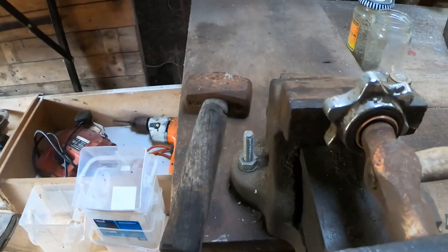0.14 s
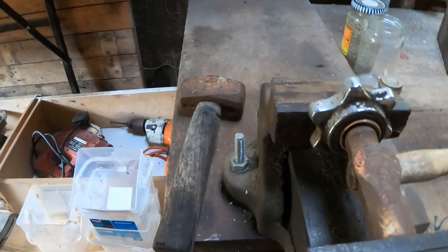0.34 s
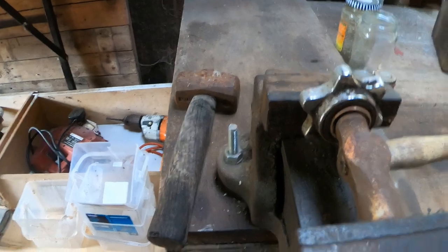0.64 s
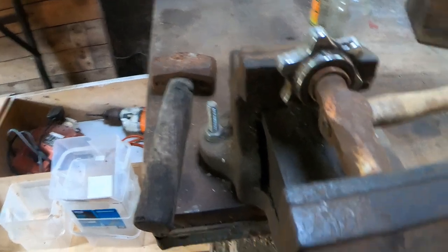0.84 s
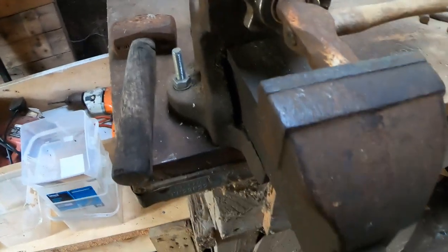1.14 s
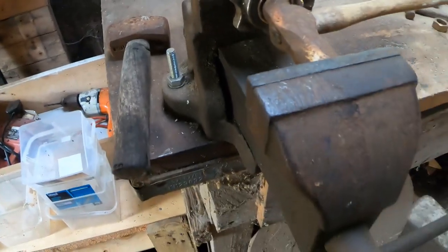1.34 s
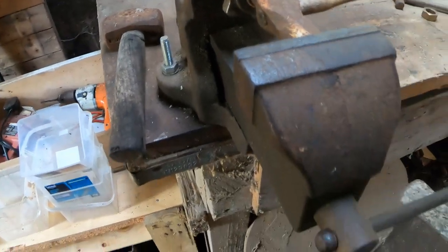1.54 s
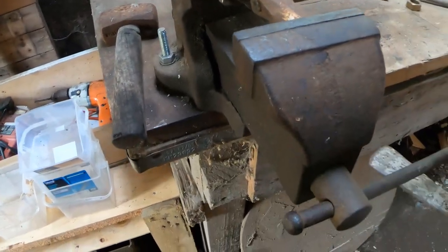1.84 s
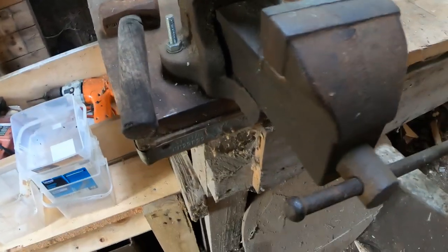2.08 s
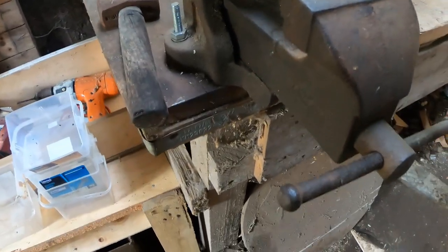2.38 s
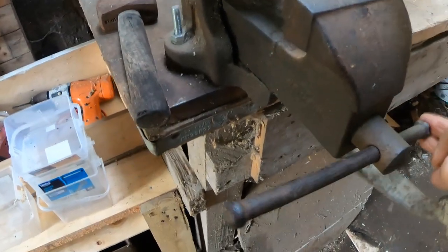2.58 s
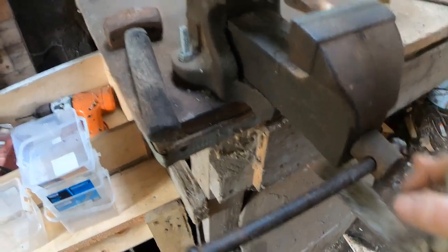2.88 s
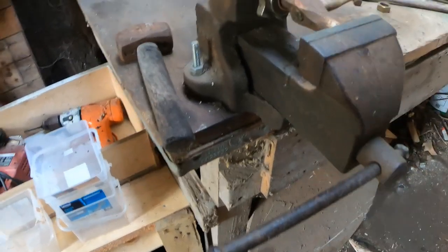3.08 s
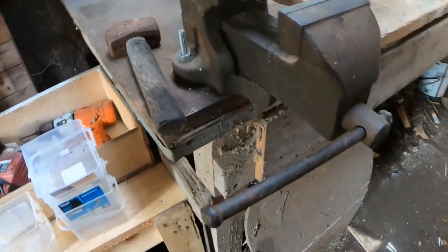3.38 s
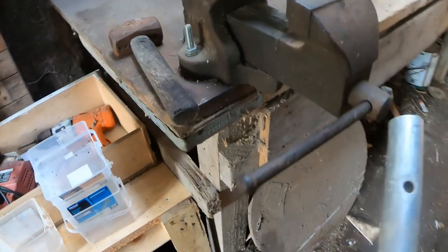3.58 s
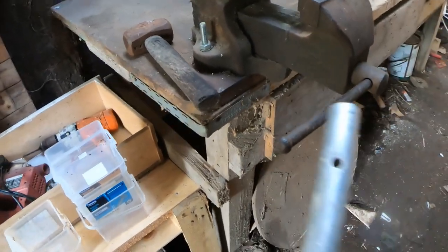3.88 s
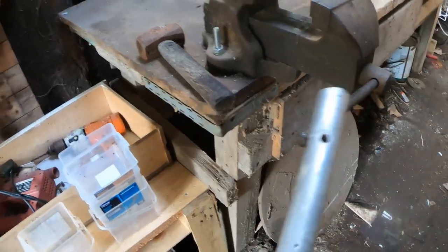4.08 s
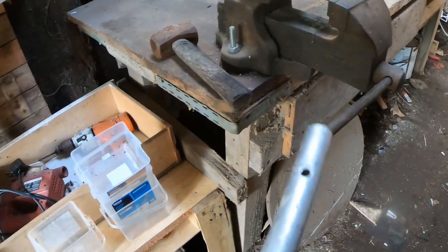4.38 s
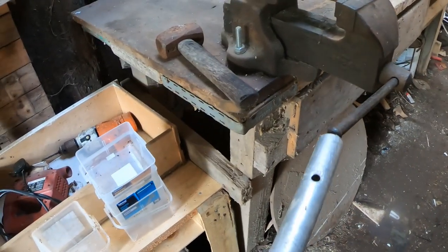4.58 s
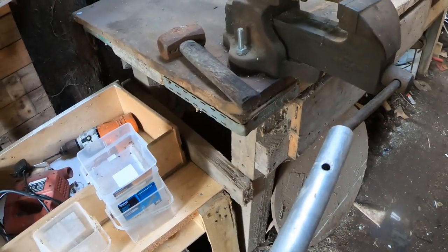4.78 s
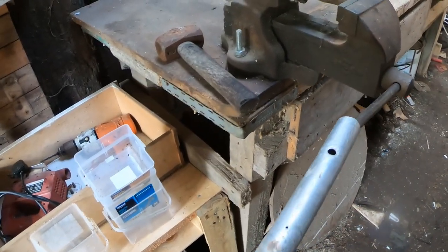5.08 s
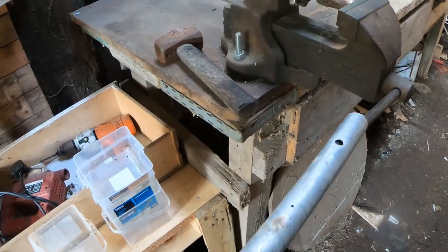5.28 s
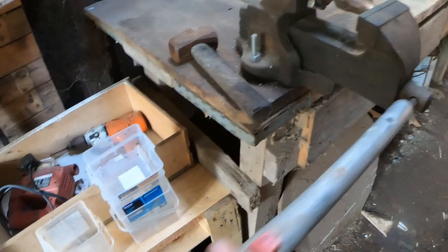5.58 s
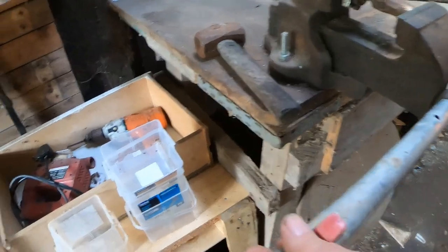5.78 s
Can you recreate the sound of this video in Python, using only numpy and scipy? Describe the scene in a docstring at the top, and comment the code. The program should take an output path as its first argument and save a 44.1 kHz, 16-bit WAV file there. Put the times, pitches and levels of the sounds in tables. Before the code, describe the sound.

In a small wooden workshop, steel briefly grates on a vice jaw, then a loose handle clacks with booming bench thuds and rasping, squealing thread. After a quieter stretch of cloth rustle and dull knocks, a hollow pipe taps and scrapes onto the handle, ending in a hard clank. Songbird, crows and low engines sound outside. Close stereo microphone, short room.

```python
"""Engines drone and rumble outside a small wooden workshop while steel grates over the iron jaw of a vice.
Loose iron clacks, the bench booms, a songbird whistles, crows call and sleeves rustle.
Then the vice is spun shut: its dry screw rasps, squeals and snaps free, and the handle clacks and ticks.
After dull knocks a pipe hoots, taps the handle, scrapes along it and seats with a loud clank.
Rubbing is shaped noise and wavering tones, blows are dying tones and noise bursts; the walls answer."""
import sys
import numpy as np
from scipy import signal
from scipy.fft import rfft, irfft, next_fast_len
from scipy.io import wavfile
from scipy.ndimage import uniform_filter1d, map_coordinates

SR = 44100
rng = np.random.default_rng(int(sys.argv[2]) if len(sys.argv) > 2 else 0)


def dump(signal):
    """Clip the signal to [-1, 1] and save it as 16-bit WAV at the path in sys.argv[1]."""
    limited = np.clip(np.atleast_2d(signal).T, -1, 1)
    pcm = np.round(limited * 32767).astype(np.int16)
    wavfile.write(sys.argv[1], SR, pcm)


N = 261513
TIME = np.arange(N) / SR  # the whole scene, in seconds
AGE = np.arange(SR * 3 // 5) / SR  # seconds since a blow

# Levels are relative: each source is mixed at its own strength.
# engine outside, speeding up, easing off and pulling again: (time [s], firing pitch [Hz], level [dB])
ENGINE = [(0.04, 59.07, -38.5), (1.73, 71.1, -41), (2.09, 67.07, -49), (2.31, 75.4, -40.5),
          (3.05, 82.3, -41.5), (3.7, 86.06, -35.5), (3.84, 79.6, -39.5), (4.16, 57.28, -46.5),
          (4.45, 56.7, -37.5), (4.6, 53.4, -42), (5.2, 57.62, -39.5), (5.43, 58.4, -28.5),
          (5.73, 60.8, -35), (5.78, 62.3, -45)]
# another engine, swelling and fading: (time [s], firing pitch [Hz], level [dB])
SECOND_ENGINE = [(.7, 71, -54), (1.3, 79.4, -41.5), (1.8, 86, -65)]
# colour of the low rumble: (frequency [Hz], level [dB per Hz])
RUMBLE_COLOUR = [(12, -18.5), (20, -1.5), (29, 2.5), (42, -8.5), (60, -7), (90, -13.5), (130, -20),
                 (200, -23), (300, -30), (500, -45), (1400, -47.5), (3000, -50), (6000, -55.5),
                 (10000, -68.5), (12000, -106)]
# likeness of the left and right noise: (frequency [Hz], likeness [0-1])
STEREO_LIKENESS = [(100, 0.92), (300, 0.92), (700, 0.15), (2000, 0.035), (5000, 0.29), (9000, 0.015)]
# how long the walls answer: (frequency [Hz], time to fall 60 dB [s])
ROOM_DECAY = [(150, 0.46), (700, 0.27), (3000, 0.23), (10000, 0.26)]
# treble loss of the microphones: (frequency [Hz], level [dB])
MICROPHONE = [(9500, -1.5), (10500, -4), (11500, -15), (13500, -8.5), (15000, -13)]

# Ring times in all tables are the time to fall by 60 dB.
# pulls of steel over the iron jaw: (start [s], length [s], level [dB])
DRAGS = [(0, 0.033, -37), (.08, 0.12, -42.5), (.217, 0.025, -39)]
# colour of steel on iron: (frequency [Hz], level [dB per Hz])
IRON_COLOUR = [(180, -32), (300, -0.5), (568, -0.5), (637, -11), (763, 0.5), (1310, -0.5), (1540, 7.5),
               (2360, -7.5), (4120, -13.5), (5180, -4), (9800, -19), (11200, -33), (13800, -21),
               (15000, -37)]
# resonances of the dragged steel: (pitch [Hz], width [Hz], level [dB])
STEEL_CHATTER = [(1090, 95, -14), (1630, 50, -14), (2380, 54, 7.5), (4710, 190, 0.5), (5230, 73, 6.5),
                 (6370, 95, -9), (8470, 170, -13)]
# steel knocking on the jaw: (time [s], knock level [dB], ring level [dB])
JAW_HITS = [(0.0325, -39.5, -60), (0.0735, -42, -50), (.083, -45, -42), (.099, -42.5, -45),
            (.121, -63, -47), (.143, -47, -44), (.228, -35.5, -40.5), (0.247, -51, -47)]
# ringing of the steel: (pitch [Hz], level [dB], ring time [s])
STEEL_MODES = [(732, 0, 0.12), (1093, 4, 0.15), (1510, 1, 0.089), (1760, -16, 0.053), (1930, -16, 0.084),
               (2420, 0, 0.11), (2900, 0.5, 0.084), (3380, -7, .08), (5060, -10, 0.11), (5770, -17, 0.11)]
# ringing of the free jaw: (pitch [Hz], level [dB], ring time [s])
JAW_MODES = [(4740, 0, .46), (4840, -2, .2), (5280, -7, .1)]
# clonk of the settling steel: (pitch [Hz], level [dB], ring time [s])
SETTLE_MODES = [(984, -2, 0.093), (1047, 9, 0.077), (1230, -3, 0.11), (3280, -0.5, 0.049)]

# loose iron jolts in its play:
# (time [s], low clack [dB], bright clack [dB], bench boom [dB], boom pitch factor [ratio])
JOLTS = [(0.285, -42, -41.5, -33, 0.97), (0.786, -51.5, -44.5, -45, 1.01), (1.53, -54, -64, -41.5, 1),
         (1.763, -32.5, -42, -26, 0.96), (1.927, -31.5, -47.5, -24.5, 0.97), (2.077, -47, -65, -31.5, 1.01),
         (2.195, -39.5, -47, -34, 1.1), (2.315, -47, -64, -36, 1.04), (2.462, -34.5, -44, -30.5, 1.06),
         (2.592, -31, -40.5, -25.5, 1.02), (2.73, -32.5, -30, -28, 1.16), (2.771, -39, -39.5, -30, 1.05)]
# handle in its play: (pitch [Hz], level [dB], ring time [s])
HANDLE_MODES = [(573, 13, 0.049), (660.7, 5.5, 0.13), (710, -4, 0.18), (832, 8.5, 0.088), (1025, -7, 0.27)]
# colours of the low and bright parts of a clack: (frequency [Hz], level [dB per Hz])
LOW_CLACK_COLOUR = [(250, 1.0), (450, -4.5), (800, -4), (1100, -28.0), (1500, -34), (4000, -67)]
BRIGHT_CLACK_COLOUR = [(700, 3.5), (1200, 2.5), (1500, 7.5), (2000, -0.5), (2700, 4.5), (6000, -32.0),
                       (12000, -69)]
# dull knocks as the pipe is picked up: (time [s], level [dB])
KNOCKS = [(3.461, -37), (3.952, -44.5)]
# colour of a dull knock: (frequency [Hz], level [dB per Hz])
KNOCK_COLOUR = [(120, -30), (300, -0.5), (520, 1.5), (800, 5.5), (950, -17), (1200, -14.0), (4000, -29.0),
                (10000, -82)]
# wooden bench before each jolt shifts it: (pitch [Hz], level [dB], ring time [s])
BENCH_MODES = [(129, -2, 0.11), (155.3, -7, 0.3), (184.8, 4.5, 0.18), (210.1, -4.5, 0.31),
               (241.7, -12.5, 0.29), (307.8, -9, 0.22), (352.6, -8.5, 0.16), (408.3, -22.5, 0.41),
               (495, -38, 0.47)]

# songbird notes: (start [s], length [s], start pitch [Hz], end pitch [Hz], level [dB], flutter [dB])
SONG = [(0.331, 0.18, 2207, 1977, -56.5, 6.5), (0.531, 0.14, 2730, 2520, -60.5, 7),
        (0.586, .09, 2210, 1880, -58.5, 10), (0.645, 0.21, 1875, 1825, -52.5, 1),
        (0.793, 0.14, 1876, 2130, -53, 1.5), (1.01, 0.073, 3220, 3115, -53, -6),
        (1.051, 0.098, 3030, 2895, -49.5, -2), (1.183, 0.08, 2970, 2800, -53, -1),
        (1.175, 0.088, 2490, 2400, -60, 6), (1.365, 0.055, 2260, 2193, -42, -17),
        (1.411, 0.055, 2200, 2040, -47, -4), (1.443, 0.097, 2048, 2095, -50, -4.5),
        (1.512, 0.15, 2166, 2260, -44.5, -4.5), (1.655, 0.13, 2268, 2323, -43, 0.5),
        (1.779, .06, 2210, 2225, -46, 0), (2.04, 0.06, 2340, 2345, -52, -20),
        (2.086, 0.1, 2310, 2295, -48, -16), (2.491, 0.078, 2303, 2388, -47.5, -18)]
# crow calls: (centre [s], half length [s], level [dB])
CAWS = [(0.6, 0.12, -42.5), (0.738, 0.43, -44.5), (0.98, 0.026, -33), (1.434, 0.11, -33), (1.68, 0.14, -36),
        (1.939, 0.087, -31.5), (2.205, 0.13, -38), (3.22, 0.065, -40), (3.31, 0.053, -38.5),
        (3.6, 0.051, -34.5), (3.742, 0.055, -37), (4.085, 0.076, -40), (4.435, 0.035, -43.5)]
# colour of a caw: (frequency [Hz], level [dB per Hz])
CAW_COLOUR = [(700, -37.5), (1150, -23.0), (1300, -4.5), (1400, -5.0), (1520, -10.0), (1750, -26.5),
              (3000, -67)]
# arm movements that crumple a sleeve: (start [s], length [s], level [dB])
CRUMPLES = [(.56, 0.28, -50), (.96, 0.21, -49), (1.27, 0.052, -47), (1.36, 0.75, -54.5), (1.94, 0.33, -49),
            (2.8, 0.5, -48), (3.47, 0.317, -46), (3.865, 0.069, -38.5), (3.97, 0.42, -59)]
# cloth gliding on cloth: (centre [s], half length [s], level [dB])
SWISHES = [(1.305, 0.052, -57.5), (1.57, 0.28, -49.5), (3.03, 0.3, -56.5), (3.28, 0.14, -63),
           (3.66, 0.08, -64.5), (3.92, 0.27, -53.5), (4.3, 0.35, -64.5)]
# colour of crumpling cloth: (frequency [Hz], level [dB per Hz])
CRUMPLE_COLOUR = [(150, -27), (300, -7.5), (500, 0.5), (850, -0.5), (1100, -2), (1800, 4.5), (2400, -3.5),
                  (3100, 3), (3900, -9.5), (5300, -6), (6600, -14.5), (8700, -16), (15000, -38)]
# colour of gliding cloth: (frequency [Hz], level [dB per Hz])
GLIDE_COLOUR = [(2350, -3.5), (4000, -4), (5890, -4), (7470, -7.5), (9020, -6.5), (13700, -17.5),
                (15000, -19)]

# pushes on the dry screw: (slip time [s], swell time [s], rasp level [dB], hum level [dB])
STROKES = [(1.763, 0.042, -38.5, -42), (1.91, 0.022, -36.5, -46.5), (2.06, 0.017, -51, -39.5),
           (2.189, 0.031, -36, -43), (2.305, 0.011, -43.5, -53.5), (2.453, 0.028, -32, -42),
           (2.586, 0.014, -35, -38.5), (2.668, 0.0098, -32.5, -50), (2.699, 0.02, -32, -47),
           (2.729, 0.012, -35.5, -29.5)]
# colour of the rasp: (frequency [Hz], level [dB per Hz])
RASP_COLOUR = [(240, -5.5), (400, -11.5), (690, -10), (1070, -17.5), (1430, -4.5), (1970, -10), (2960, -20),
               (4130, -19.5), (7930, -34.5), (10700, -33.5), (12100, -72), (13100, -44), (15000, -44)]
# the rubbed handle: (pitch [Hz], width [Hz], level [dB])
HANDLE_GROAN = [(657, 34, -6), (855.5, 8.4, 6)]
# resonances of the screw: (pitch [Hz], width [Hz], level [dB])
SCREW_PEAKS = [(2820, 28, -2), (3043, 37, 3.5), (3430, 160, -3), (3750, 60, 0), (4620, 155, -9),
               (5330, 31, -13.5), (6860, 67, -14.5), (8100, 91, -37)]
# squeals of the thread:
# (start [s], length [s], start pitch [Hz], end pitch [Hz], low tone [dB], upper tone [dB])
SQUEALS = [(1.723, 0.033, 2900, 2860, -47, -51), (1.894, 0.022, 2860, 2910, -43, -52.5),
           (2.154, 0.035, 2910, 2860, -53, -51), (2.582, 0.0087, 3120, 2960, -40.5, -51.5),
           (2.653, 0.016, 3180, 3030, -44.5, -59), (2.675, 0.04, 2930, 2880, -43.5, -53),
           (2.705, 0.029, 2904, 2865, -30, -59)]
# the thread lets go: (time [s], level [dB])
SNAPS = [(1.758, -40.5), (1.921, -44.5), (2.434, -41.5), (2.448, -42.5), (2.583, -47.5), (2.7165, -33),
         (2.7245, -50)]
# colour of a snap: (frequency [Hz], level [dB per Hz])
SNAP_COLOUR = [(600, -2), (1700, 3.0), (3600, 0.0), (4400, -7.0), (7500, -16), (11000, -41), (15000, -40)]
# small ticks of the handle against its collar: (time [s], level [dB])
TICKS = [(1.845, -53), (2.013, -47.5), (2.24, -46.5), (2.864, -38.5)]
# colour of a tick: (frequency [Hz], level [dB per Hz])
TICK_COLOUR = [(400, -18), (900, 1.0), (3500, -2.5), (4500, -6), (8000, -9), (15000, -31)]

# hoots of the hollow pipe: (centre [s], half length [s], level [dB])
HOOTS = [(4.785, 0.062, -54), (5.03, 0.025, -49), (5.12, 0.062, -43.5), (5.29, 0.028, -44.5)]
# resonances of the hoot: (pitch [Hz], width [Hz], level [dB])
HOOT_PEAKS = [(686, 134, -1), (780, 15, 7.5)]
# the pipe touches the handle: (time [s], click level [dB], ring level [dB], click tilt [dB per octave])
TAPS = [(4.7455, -42, -40, 0.5), (4.792, -41, -40, -2.5), (4.820, -40, -36.5, 1.5), (4.980, -53, -50, 2),
        (5.007, -45, -49, -1.5), (5.025, -46.5, -38.5, 1), (5.059, -45, -42.5, 0), (5.124, -41, -49, -3),
        (5.151, -41, -39.5, -1), (5.200, -39, -41.5, 1), (5.215, -39.5, -56, 0.5), (5.248, -39, -46, -1.5),
        (5.269, -44, -51, 4), (5.287, -42, -54, -0.5), (5.318, -42.5, -37.5, 0), (5.338, -49.5, -36.5, 7),
        (5.386, -59, -41, 7), (5.407, -50, -44, 11), (5.434, -40.5, -42.5, 3), (5.455, -50, -48, 12),
        (5.497, -51.5, -37, 2), (5.526, -43, -40.5, 5), (5.569, -48, -41, 1.5)]
# strongest pipe modes, each sings best at one depth of contact:
# (pitch [Hz], ring time [s], level [dB], best depth [0-1], reach [depth], level far from it [dB])
SINGING_MODES = [(1458, 0.32, -1.5, 0.31, 0.32, -28), (2110, 0.28, -1.5, 0.81, 0.067, -18.5),
                 (2512, 0.1, -7, 0.88, 0.13, -11), (4855, 0.31, 1.5, 0.85, 0.042, -10),
                 (5268, 0.15, 1, 0.14, 0.24, -17.5), (5230, 0.11, 3, 0.71, 0.066, -26)]
# weaker pipe modes: (pitch [Hz], level [dB], ring time while loose [s])
PIPE_MODES = [(703, 1.5, 0.18), (791, 5, 0.23), (900, -19, 0.24), (1304, 4, 0.33), (1542, -2.5, 0.33),
              (2230, 9.5, 0.056), (2552, -16, 0.17), (2550, 1, 0.2), (3215, -0.5, 0.26), (3540, -14, 0.16),
              (3840, -20, .2), (4230, -1.5, 0.11), (5800, -20, 0.25), (6500, -8, 0.15), (7200, -13, 0.1),
              (8260, -12, 0.18)]
# shoves of the pipe along the handle: (start [s], length [s], scrape level [dB], singing level [dB])
SHOVES = [(4.817, 0.046, -56, -47), (4.88, 0.095, -64, -64), (5.003, 0.174, -62.5, -49.5),
          (5.204, 0.088, -51.5, -60), (5.325, 0.029, -51, -44), (5.379, 0.019, -50, -52),
          (5.428, 0.047, -47, -56), (5.488, 0.067, -48.5, -45.5), (5.565, 0.031, -56, -43.5),
          (5.657, 0.12, -47.5, -41.5)]
# colour of the scrape: (frequency [Hz], level [dB per Hz])
SCRAPE_COLOUR = [(150, 5), (280, 1.5), (430, -12), (750, -11), (950, -7), (1400, -3.5), (1850, -7),
                 (2400, -6.5), (3800, -15.5), (5300, -4), (7300, -16.5), (10000, -31), (12000, -45),
                 (15000, -48)]
# resonances of the scraping tube: (pitch [Hz], width [Hz], level [dB])
TUBE_PEAKS = [(790, 61, -5), (1290, 29, -1.5), (1440, 28, -21), (2140, 11, -17), (2460, 40, -9.5),
              (3220, 180, -2), (4000, 61, -11), (4330, 22, 3), (4930, 22, 7.5), (5240, 39, -11),
              (6112, 28, 3), (7150, 100, -9.5), (8300, 160, -21), (9740, 42, -20), (12600, 120, -21)]
# the pipe rattles against the screw head and hits home:
# (time [s], crack level [dB], ring level [dB], head level [dB])
CLANKS = [(5.6755, -32, -39.5, -47), (5.694, -37, -33.5, -38), (5.7214, -12.5, -23, -42),
          (5.7325, -30, -31.5, -27.5), (5.739, -34, -36, -38)]
# colour of the crack: (frequency [Hz], level [dB per Hz])
CRACK_COLOUR = [(180, -31), (300, -11.5), (568, -17), (1000, -7), (1350, 0), (1620, -1.5), (1850, -20),
                (2480, 2.5), (2820, -23), (3860, -22), (4850, -25), (8460, -36), (11200, -56), (12500, -61),
                (15000, -85)]
# screw head with the pipe on it: (pitch [Hz], level [dB], ring time [s])
HEAD_MODES = [(704, 1.5, 0.12), (894, -4, 0.25), (1085, -9, 0.1), (1465, -3, 0.19), (1590, -7, 0.13),
              (2157, 2, 0.12), (2590, -16, 0.4), (3170, -3.5, 0.082), (4740, -13, 0.33)]

TOP_HZ = 15000  # nothing higher is kept
ROAD_DB, ROAD_SWING_DB = -38, 1.5  # rumble level and its slow unevenness
PRESSED_T60_S = 0.22  # the jaw rings briefly while the steel rests on it
LIFT_S, LIFT_DB = .257, -40.5  # the steel lifts and the jaw sings on freely
DROP_S, DROP_DB = .282, -37.5  # the steel settles with a clonk
THUMP_LAG_S = 0.01065  # the bench follows each jolt
CLACK_RISE_S = 0.0055  # the heavy iron takes up its play softly
BLUR_PER_S = 160  # how fast a whistle flutters
MOVE_ATTACK_S, MOVE_RELEASE_S, MOVE_DRIFT_DB = 0.042, 0.022, -2  # each crumple starts, stops and wavers alike
SLIP_S = 0.01  # the rasp dies this fast once the thread slips
UPPER_SQUEAL_HZ, SQUEAL_JITTER = (5370, 5260), 0.0076  # start and end of the upper tone; pitch scatter
SQUEAL_HISS_DB = -7
PIPE_ON_S, SEATED_S = 4.7, 5.7212  # the pipe slides on at a steady speed: depth 0 to 1
SEAT_JOLT_DB = -27  # its arrival jolts the bench too
GRIP = 0.45  # share of its ring time that the pipe loses when it is fully on
BORE_SHIFT_DB, BORE_SHIFT_PER_S = 4, 13  # how far and how fast tube resonances swell and fade
RUB_JITTER_HZ, RUB_FLUTTER_DB, WANDER = 16, 2.5, .003  # trembling pitch, trembling level, pitch bend


def amp(db):
    """Turn decibels into a gain."""
    return 10 ** (np.asarray(db) / 20)


def unit(x):
    """Scale to an average strength (rms) of 1."""
    return x / np.sqrt(np.mean(x ** 2) + 1e-20)


def struck(x):
    """Scale a blow to rms 1 over its first 25 ms."""
    return x / np.sqrt(np.mean(x[..., :SR // 40] ** 2) + 1e-20)


def along(points, hz):
    """Read (Hz, value) points on a log frequency axis."""
    f, v = np.transpose(points)
    return np.interp(np.log(hz + 1), np.log(f), v)


def level(rows):
    """Gain over time from rows (s, .., dB), fading out beyond them."""
    rows = np.array(rows)
    outside = np.maximum(np.maximum(rows[0, 0] - TIME, TIME - rows[-1, 0]), 0)
    return amp(np.interp(TIME, rows[:, 0], rows[:, -1])) * np.exp(-outside / 0.18)


def held(rows, attack, release):
    """Attack, hold and release for each (start s, length s, dB) row."""
    total = 0
    for s, length, db in rows:
        edges = np.minimum((TIME - s) / attack, (s + length - TIME) / release)
        total = total + amp(db) * np.exp(np.minimum(edges, 0))
    return total


def swells(rows):
    """A smooth rise and fall for each (centre s, half length s, dB) row."""
    return sum(amp(db) * np.exp(-2 * ((TIME - s) / half) ** 2) for s, half, db in rows)


def wobble(rate):
    """A smooth random curve through rate random points a second."""
    return map_coordinates(rng.standard_normal(int(N * rate / SR) + 4), [TIME * rate])


def filtered(x, response):
    """Multiply each frequency in x by a response."""
    n = x.shape[-1]
    m = next_fast_len(n + SR // 4)
    return irfft(rfft(x, m) * response(np.fft.rfftfreq(m, 1 / SR)), m)[..., :n]


def coloured(x, spectrum):
    """Shape x with a (Hz, dB) spectrum, at rms 1."""
    return unit(filtered(x, lambda hz: amp(along(spectrum, hz))))


def resonant(x, peaks):
    """Send x through (Hz, width, dB) resonances of alternating sign, at rms 1."""
    def response(f):
        total = 0
        for k, (centre, width, db) in enumerate(peaks):
            damping = 1j * f * width
            total = total + (-1) ** k * amp(db) * damping / (centre * centre - f * f + damping)
        return total
    return unit(filtered(x, response))


def noise(size):
    """White noise at two close microphones: much alike in the bass, mostly unrelated higher up."""
    def shares(hz):
        turn = np.arccos(np.clip(along(STEREO_LIKENESS, hz), -1, 1)) / 2
        return np.array([np.cos(turn), np.sin(turn)])
    mid, side = filtered(rng.standard_normal((2, size)), shares)
    return np.array([mid + side, mid - side])


def grit(rate, spread_db, hiss):
    """Friction: tiny slips of uneven size over a hiss; the moving contact favours ever new frequencies."""
    sizes_db = spread_db * np.minimum(rng.exponential(size=N), 3)
    slips = (rng.random(N) < rate / SR) * rng.choice([-1, 1], N) * amp(sizes_db)
    z = signal.stft(unit(slips) + hiss * rng.standard_normal(N), nperseg=512)[2]
    field = uniform_filter1d(rng.standard_normal(z.shape), size=4, axis=0)  # smooth over frequency
    field = uniform_filter1d(field, size=7, axis=1)  # and over time
    return unit(signal.istft(z * amp(4.2 * unit(field)), nperseg=512)[1][:N])


def ring(modes, scatter_db, attack):
    """One blow on (Hz, dB, ring time) modes: dying tones, their strengths scattered at random."""
    hz, db, t60 = np.transpose(modes)[:, :, None]
    scatter = scatter_db * rng.standard_normal(hz.shape)
    gain = rng.choice([-1, 1], hz.shape) * amp(db + scatter - 60 * AGE / t60)
    tones = np.sum(gain * np.sin(2 * np.pi * hz * AGE), 0)
    return struck(tones * (1 - np.exp(-AGE / attack)))


def burst(spectrum, t60):
    """A blow on many dense, quickly dying modes, made from noise."""
    onset = np.sin(np.pi / 2 * np.minimum(AGE / .0008, 1)) ** 2
    return struck(coloured(rng.standard_normal(len(AGE)), spectrum) * onset * amp(-60 * AGE / t60))


def add(track, s, x):
    """Mix x into the track from time s."""
    start = max(round(s * SR), 0)
    track[..., start:start + x.shape[-1]] += x[..., :N - start]


def in_room(x, wet_db, pan_db):
    """Direct sound plus a fresh answer of the wooden walls, balanced to keep the total power."""
    hz, t, z = signal.stft(noise(SR // 2), SR, nperseg=256)
    tail = signal.istft(z * amp(-60 * t / along(ROOM_DECAY, hz)[:, None]), SR, nperseg=256)[1]
    tail = np.pad(tail / np.linalg.norm(tail[0]), ((0, 0), (SR // 250, 0)))  # answers 4 ms later
    wet = signal.fftconvolve(x[None], tail, axes=1)[:, :len(x)]
    mix = (x + amp(wet_db) * wet) / np.hypot(1, amp(wet_db))
    return mix * amp([[pan_db / 2], [-pan_db / 2]])


def drone(rows):
    """Only the firing note of a far exhaust gets through the walls: one tone."""
    s, hz, _ = np.transpose(rows)
    tone = unit(np.sin(2 * np.pi * np.cumsum(np.interp(TIME, s, hz)) / SR))
    return level(rows) * amp(1.24 * wobble(9)) * tone


def traffic():
    """Engines changing speed over a low, uneven rumble."""
    rumble = amp(ROAD_DB + ROAD_SWING_DB * wobble(2.8)) * coloured(noise(N), RUMBLE_COLOUR)
    return rumble + amp(1.5) * drone(ENGINE) + amp(0.5) * drone(SECOND_ENGINE)


def dragged_steel():
    """Steel grates over the iron jaw, knocks on its edges, leaves it ringing and settles with a clonk."""
    slips = grit(rate=500, spread_db=0, hiss=0.2)
    texture = amp(-0.5) * coloured(slips, IRON_COLOUR) + amp(-3.0) * resonant(slips, STEEL_CHATTER)
    grating = held(DRAGS, attack=0.0035, release=0.0029) * texture
    knocks, rings = np.zeros((2, N))
    pressed = [(hz, 0, PRESSED_T60_S) for hz, *_ in JAW_MODES[1:]]  # the steel's weight mutes the lowest mode
    for s, knock_db, ring_db in JAW_HITS:
        knock = burst(IRON_COLOUR, t60=0.052) + amp(-5.0) * ring(STEEL_MODES, scatter_db=2.5, attack=0.00047)
        add(knocks, s, amp(knock_db) * knock)
        add(rings, s, amp(ring_db) * ring(pressed, scatter_db=9, attack=0.0022))
    add(rings, LIFT_S, amp(LIFT_DB) * ring(JAW_MODES, scatter_db=-12, attack=0.0023))
    add(rings, DROP_S, amp(DROP_DB) * ring(SETTLE_MODES, scatter_db=1, attack=.002))
    out = in_room(grating, wet_db=3.5, pan_db=-8.0)
    out = out + in_room(knocks, wet_db=-3, pan_db=-2.5)
    return out + in_room(rings, wet_db=-4.5, pan_db=-2.0)


def clacks():
    """The handle and the sliding jaw knock in their play; the pipe is lifted with dull knocks."""
    out = np.zeros((2, N))
    rise = 1 - np.exp(-AGE / CLACK_RISE_S)
    for s, low_db, bright_db, *_ in JOLTS:
        low = ring(HANDLE_MODES, scatter_db=3, attack=.001)
        low = low + amp(4.0) * burst(LOW_CLACK_COLOUR, t60=0.059)
        bright = burst(BRIGHT_CLACK_COLOUR, t60=0.057)
        blow = rise * (amp(low_db) * struck(low) + amp(bright_db) * bright)
        blow = in_room(blow, wet_db=-4.0, pan_db=1.0)
        add(out, s, amp(-2.0) * struck(blow) * np.hypot(amp(low_db), amp(bright_db)))
    for s, db in KNOCKS:
        knock = burst(KNOCK_COLOUR, t60=0.038)
        add(out, s, amp(db) * in_room(knock, wet_db=-2.5, pan_db=-1.0))
    return out


def bench():
    """Each jolt rocks the wooden bench, which booms briefly; its loose joints shift the pitch with each load."""
    out = np.zeros((2, N))
    for s, *_, db, pitch in JOLTS + [(SEATED_S, SEAT_JOLT_DB, 1)]:
        modes = []
        for hz, mode_db, t60 in BENCH_MODES:
            modes.append((hz * pitch * (1 + .02 * rng.standard_normal()), mode_db, t60))
        boom = in_room(ring(modes, scatter_db=2.5, attack=0.005), wet_db=-14.0, pan_db=0)
        add(out, s + THUMP_LAG_S, amp(db) * struck(boom))
    return out


def birds():
    """Gliding whistles, some pure and some fluttering, and hoarse caws of shaped noise from outside."""
    pure, blurred = np.zeros((2, N))
    for s, length, start_hz, end_hz, db, flutter_db in SONG:
        progress = np.linspace(0, 1, round(length * SR))
        phase = 2 * np.pi * np.cumsum(start_hz + (end_hz - start_hz) * progress) / SR
        note = amp(db) * np.sqrt(np.abs(np.sin(np.pi * progress))) * np.sin(phase)
        add(pure, s, note)
        add(blurred, s, amp(flutter_db) * note)
    whistles = pure + blurred * (wobble(BLUR_PER_S) + 0.7 * wobble(500))
    caws = swells(CAWS) * coloured(rng.standard_normal(N), CAW_COLOUR)
    caws = in_room(caws, wet_db=-8.5, pan_db=-1.0) * [[1], [-1]]  # from the side, so left and right oppose
    return amp(2) * in_room(whistles, wet_db=2.0, pan_db=2.0) + caws


def sleeves():
    """Cloth crumples as the arms move and hisses where it glides."""
    fibres = unit(grit(rate=3000, spread_db=5, hiss=.7) + .7 * rng.standard_normal(N))
    motion = held(CRUMPLES, MOVE_ATTACK_S, MOVE_RELEASE_S) * amp(MOVE_DRIFT_DB * wobble(8.9))
    crumple = in_room(motion * coloured(fibres, CRUMPLE_COLOUR), wet_db=-1.0, pan_db=-3.5)
    glide = swells(SWISHES) * coloured(noise(N), GLIDE_COLOUR)
    return amp(-5.5) * crumple + amp(0.5) * glide


def screw():
    """Each push on the handle swells into a rasp that sets screw and handle humming, then the thread slips free."""
    rasp, hum = np.zeros((2, N))
    for s, swell, rasp_db, hum_db in STROKES:
        pressure = np.exp(np.minimum((TIME - s) / swell, (s - TIME) / SLIP_S))
        rasp += amp(rasp_db) * pressure
        hum += amp(hum_db) * pressure
    slips = grit(rate=930, spread_db=7.0, hiss=0.84)
    rasp *= coloured(slips, RASP_COLOUR) + amp(-5) * resonant(slips, HANDLE_GROAN)
    hum *= resonant(grit(rate=1200, spread_db=2, hiss=.3), SCREW_PEAKS)
    return in_room(rasp, wet_db=1.0, pan_db=1.0) + in_room(hum, wet_db=-13.0, pan_db=-2.0)


def squeals():
    """The dry thread locks into two rough, wavering tones that glide in pitch."""
    out = np.zeros(N)
    for s, length, start_hz, end_hz, low_db, high_db in SQUEALS:
        for glide, db in (((start_hz, end_hz), low_db), (UPPER_SQUEAL_HZ, high_db)):
            hz = np.interp(TIME, (s, s + length), glide) * (1 + SQUEAL_JITTER * wobble(300))
            tone = unit(np.sin(2 * np.pi * np.cumsum(hz) / SR))
            out += held([(s, length, db)], attack=0.0028, release=0.003) * tone
    judder = amp(2.8 * wobble(150)) * (1 + amp(SQUEAL_HISS_DB) * wobble(900))
    return in_room(out * judder, wet_db=-12, pan_db=-5)


def snaps():
    """The stuck thread lets go with a crack that rings the screw."""
    out = np.zeros((2, N))
    # a narrower resonance rings longer
    modes = [(hz, db, np.log(1000) / (np.pi * width)) for hz, width, db in SCREW_PEAKS]
    for s, db in SNAPS:
        crack = burst(SNAP_COLOUR, t60=0.11)
        snap = crack + amp(-2) * ring(modes, scatter_db=13.5, attack=0.00064)
        add(out, s, amp(db) * in_room(snap, wet_db=-7.5, pan_db=-1.0))
    return out


def ticks():
    """Small, bright ticks of the handle against its collar; the jaw rings faintly."""
    out = np.zeros((2, N))
    for s, db in TICKS:
        tick = burst(TICK_COLOUR, t60=0.007)
        tick = tick + amp(-11.5) * ring(JAW_MODES, scatter_db=-9, attack=.001)
        add(out, s, amp(db - 6.0) * in_room(tick, wet_db=3.0, pan_db=-4.0))
    return out


def pipe_hoot():
    """Rubbing makes the hollow pipe hoot now and then: noise through its resonances."""
    return in_room(swells(HOOTS) * resonant(rng.standard_normal(N), HOOT_PEAKS), wet_db=0.0, pan_db=-0.5)


def depth(s):
    """How far the pipe is on at time s: 0 at first, 1 when seated."""
    return (s - PIPE_ON_S) / (SEATED_S - PIPE_ON_S)


def depth_share(s, best, reach, off_db):
    """How strongly a contact at time s excites a pipe mode, from how far the pipe is on."""
    return np.exp(-((depth(s) - best) / reach) ** 2) + amp(off_db)


def pipe_taps():
    """Each touch rings the pipe; the contact depth decides which modes sing and how soon the handle damps them."""
    out = np.zeros((2, N))
    for s, click_db, ring_db, tilt_db in TAPS:
        click = amp(-3) * burst(SCRAPE_COLOUR, t60=0.031)
        click = click + amp(-6.0) * ring(PIPE_MODES, scatter_db=-4.5, attack=0.00018)
        tilted = filtered(click, lambda hz: amp(tilt_db * np.log2(np.clip(hz, 500, 8000))))
        click = np.std(click) * unit(tilted)  # the tilt leaves the strength unchanged
        song = 0
        for hz, t60, db, *contact in SINGING_MODES:
            pitch = hz * (1 + .002 * rng.standard_normal())
            damped_t60 = t60 * (1 - GRIP * depth(s) ** 2)
            mode = ring([(pitch, 0, damped_t60)], scatter_db=0, attack=.0004)
            song = song + amp(db) * depth_share(s, *contact) * mode
        click = in_room(click, wet_db=-3, pan_db=-1.5)
        add(out, s, amp(click_db) * click + amp(ring_db) * in_room(song, wet_db=0.0, pan_db=-1.0))
    return out


def wander(x):
    """The moving contact bends the pitch of x slightly."""
    drift = np.cumsum(WANDER * np.gradient(wobble(14)) * SR / 14)
    return map_coordinates(x, [np.arange(N) + drift])


def shifting(x, peaks):
    """Resonances that each swell and fade on their own as the contact moves, at rms 1."""
    total = 0
    for hz, width, db in peaks:
        gain = amp(db + BORE_SHIFT_DB * wobble(BORE_SHIFT_PER_S)) * np.sqrt(width)
        total = total + gain * resonant(x, [(hz, width, 0)])
    return unit(total)


def rubbed(hz):
    """A mode kept singing by friction: a tone that trembles in pitch and strength."""
    pitch = hz + RUB_JITTER_HZ * wobble(90)
    return unit(amp(RUB_FLUTTER_DB * wobble(110)) * np.sin(2 * np.pi * np.cumsum(pitch) / SR))


def pipe_slide():
    """The rough bore chatters along the handle, catching on burrs; rubbing keeps the pipe singing, wandering in pitch."""
    push = held([row[:3] for row in SHOVES], attack=0.005, release=0.016)
    rub = held([(s, length, db) for s, length, _, db in SHOVES], attack=0.0053, release=0.018)
    stick_slip = unit(amp(3.5 * wobble(70)))
    slips = push * stick_slip * grit(rate=540, spread_db=2.5, hiss=0.14)
    burrs = push * grit(rate=80, spread_db=2, hiss=0)
    chatter = amp(-0.5) * coloured(slips, SCRAPE_COLOUR) + amp(6.0) * wander(shifting(slips, TUBE_PEAKS))
    chatter = in_room(chatter, wet_db=0.5, pan_db=-0.8)
    catches = amp(2) * coloured(burrs, SCRAPE_COLOUR) + amp(3) * resonant(burrs, TUBE_PEAKS)
    catches = in_room(catches, wet_db=-4, pan_db=-1.0)
    song = 0
    for hz, _, db, *contact in SINGING_MODES:
        song = song + amp(db) * depth_share(TIME, *contact) * rubbed(hz)
    song = in_room(rub * wander(song), wet_db=-5, pan_db=-0.5)
    return np.std(slips) * (chatter + catches) + amp(2.5) * song


def pipe_clank():
    """The pipe slams on the screw head: a hard crack, a low ring damped by the tight seat, and the head's own ring."""
    out = np.zeros((2, N))
    modes = []
    for hz, db, t60 in PIPE_MODES + [(hz, -2, t60) for hz, t60, *_ in SINGING_MODES]:
        # weaker by 5 dB per octave away from 2050 Hz, and much shorter
        modes.append((hz, db - 5 * abs(np.log2(hz / 2050)), 0.19 * t60))
    for s, crack_db, ring_db, head_db in CLANKS:
        crack = in_room(burst(CRACK_COLOUR, t60=.016), wet_db=0, pan_db=-3)
        ringing = in_room(ring(modes, scatter_db=2, attack=.002), wet_db=4, pan_db=0)
        head = in_room(ring(HEAD_MODES, scatter_db=1, attack=0.0013), wet_db=-9, pan_db=0)
        add(out, s, amp(crack_db - 6.0) * crack + amp(ring_db) * struck(ringing) + amp(head_db) * head)
    return out


def scene():
    """Surroundings, vice and pipe together."""
    surroundings = traffic() + birds() + sleeves()
    vice = dragged_steel() + clacks() + bench() + screw() + squeals() + snaps() + ticks()
    pipe = pipe_hoot() + pipe_taps() + pipe_slide() + pipe_clank()
    return surroundings + vice + pipe


def record(dry):
    """The microphones lose the top treble, and nothing from TOP_HZ upwards is kept."""
    return filtered(dry, lambda hz: amp(along(MICROPHONE, hz)) * (hz < TOP_HZ))


dry = scene()
out = record(dry)
dump(out)
```